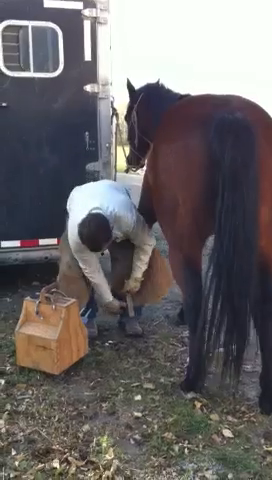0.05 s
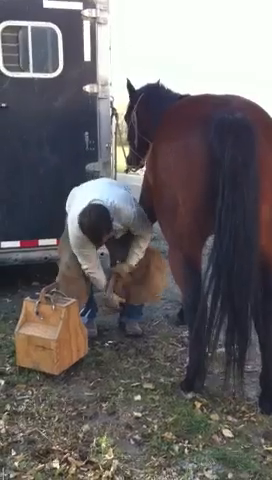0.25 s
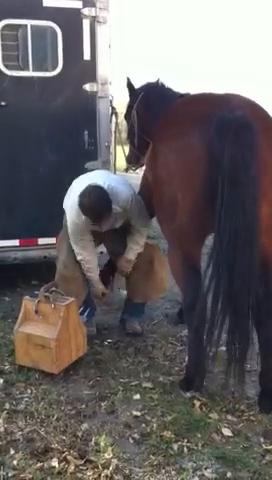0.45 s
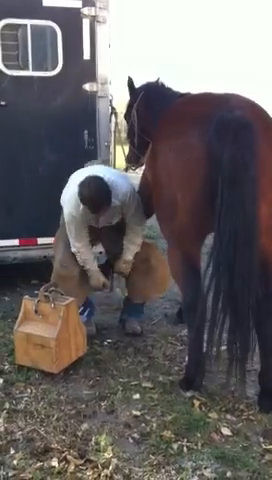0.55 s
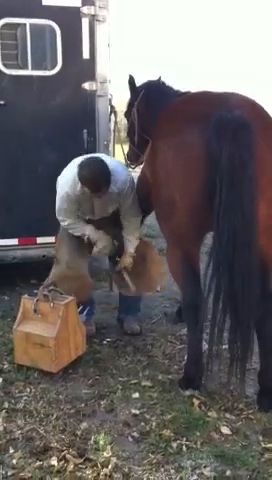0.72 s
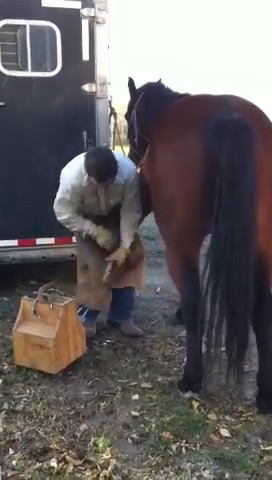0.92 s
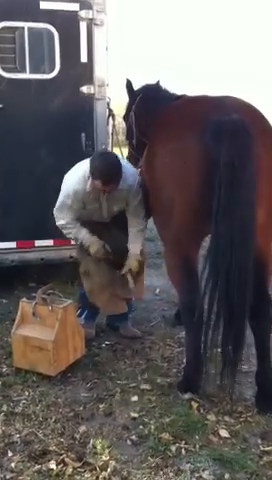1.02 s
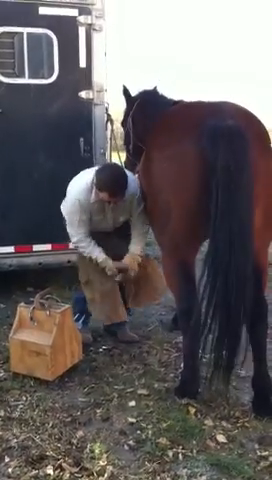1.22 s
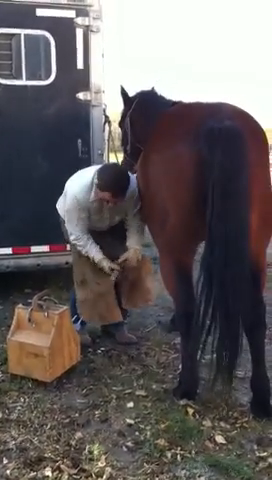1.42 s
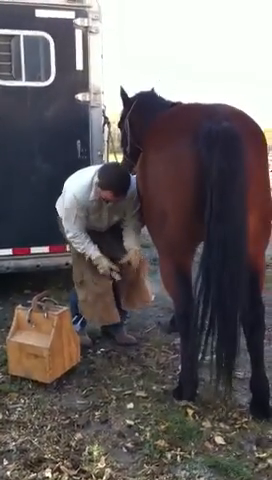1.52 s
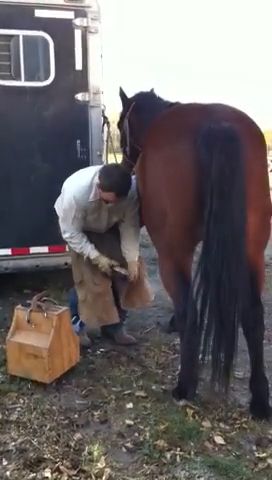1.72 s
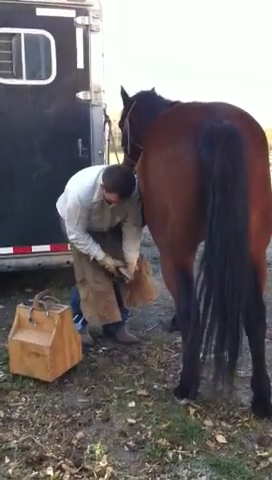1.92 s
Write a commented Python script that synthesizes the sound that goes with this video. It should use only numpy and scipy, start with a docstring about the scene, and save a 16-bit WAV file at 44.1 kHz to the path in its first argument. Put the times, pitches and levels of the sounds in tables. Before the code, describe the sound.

A handled microphone gives muffled, uneven thumps that ease off briefly and then return more softly. Behind them, a few metres off in the open air, are faint tool clicks, one tiny steel clink, leather swishes, boot scuffs and hiss.

```python
"""Dull bumps and rumble, probably a hand on the microphone, filtered through its case.
A few metres away, outdoors, a farrier picks up his tools beside a horse: light ticks, one steel
clink, dull knocks. Something swishes past the leather apron and boots scuff on dry ground,
both as grainy friction noise. A steady hiss lies underneath."""
import sys
import numpy as np
from scipy import signal
from scipy.fft import rfft, irfft
from scipy.io import wavfile

SR = 44100
rng = np.random.default_rng(int(sys.argv[2]) if len(sys.argv) > 2 else 0)


def store_wav(level_fs):
    """Save 16-bit WAV to argv[1]."""
    pcm = np.round(np.clip(np.atleast_2d(level_fs), -1, 1) * 32767)
    wavfile.write(sys.argv[1], SR, pcm.T.astype(np.int16))


N = 85995
TIME_S = np.arange(N) / SR


def from_db(db):
    """dB to gain."""
    return 10 ** (np.asarray(db) / 20)


def unit_rms(x):
    """Scale to rms 1."""
    return x / np.sqrt(np.mean(x ** 2) + 1e-20)


def envelope(rows):
    """Gain curve from rows of time_s, level_db."""
    return from_db(np.interp(TIME_S, *np.transpose(rows)))


def noise(colour):
    """Unit-rms noise shaped by rows of freq_hz, gain_db."""
    freq_hz, gain_db = np.transpose(colour)
    bins_hz = np.maximum(np.arange(N // 2 + 1) * SR / N, 1)
    gain = from_db(np.interp(np.log(bins_hz), np.log(freq_hz), gain_db))
    return unit_rms(irfft(rfft(rng.standard_normal(N)) * gain, N))


def butter(x, corner_hz, kind, order):
    """Causal Butterworth filter."""
    return signal.sosfilt(signal.butter(order, corner_hz, kind, fs=SR, output="sos"), x)


def swell(peak_s, rise_s, fall_s, roundness=1):
    """Rise to 1, then fall; roundness 1 is exponential, 2 bell-shaped."""
    return np.exp(-np.maximum((peak_s - TIME_S) / rise_s, (TIME_S - peak_s) / fall_s) ** roundness)


def strike(start_s, modes):
    """Decaying modes of a struck body."""
    age_s = np.maximum(TIME_S - start_s, 0)
    return sum(from_db(db) * np.exp(-np.log(1000) * age_s / t60_s) * np.sin(2 * np.pi * hz * age_s)
               for hz, db, t60_s in modes)


def grain(depth_db, rate_hz):
    """Fast random gain of a rubbed rough surface."""
    flicker = unit_rms(butter(rng.standard_normal(N), rate_hz, "low", order=2))
    return unit_rms(from_db(depth_db * flicker))


def through_case(force, top_hz):
    """A soft contact loses treble in the case and deep bass in the microphone."""
    bass_cut_hz = 122.3 * (top_hz / 190) ** 0.33  # firmer contact, less deep bass
    return butter(butter(force, top_hz, "low", order=4), bass_cut_hz, "high", order=4)


def handling(contact_sigma_s=0.00056, bump_trim_db=-1.13):
    """Soft pushes on the microphone: single ones bump, random pressure rumbles."""
    # contacts: peak_s, level_db, top_hz (higher is firmer)
    bumps = [(0.015, -45.5, 169), (0.083, -39, 195), (0.2098, -44.5, 108), (0.2229, -33.5, 160),
             (0.2339, -40.5, 174), (0.307, -44, 198), (0.3506, -29.5, 233), (0.3737, -36, 153),
             (0.4048, -46, 129), (0.4459, -35.5, 214), (0.4556, -33.5, 199), (0.4752, -36.5, 198),
             (0.5077, -43, 145), (0.5232, -33, 268), (0.5326, -31.5, 173), (0.5459, -39, 146),
             (0.5672, -24, 200), (0.5765, -17.5, 244), (0.588, -33, 197), (0.609, -29.5, 258),
             (0.6291, -32.5, 153), (0.6443, -27.5, 225), (0.6706, -42.5, 160), (0.6885, -40.5, 164),
             (0.7306, -31.5, 176), (0.791, -37, 163), (0.8086, -34.0, 171), (0.8613, -43.5, 172),
             (0.9135, -25.5, 250), (0.966, -30, 186), (0.9816, -44, 213), (1.0058, -40, 134),
             (1.0185, -44.5, 156), (1.0645, -32, 194), (1.091, -40, 110), (1.303, -51.5, 104),
             (1.4993, -47.5, 172), (1.5344, -43.5, 202), (1.5483, -44, 174), (1.5614, -49, 159),
             (1.5938, -40, 174), (1.6585, -35.5, 206), (1.6817, -36.5, 233), (1.738, -40.5, 154),
             (1.772, -51, 151), (1.9083, -51, 181), (1.9254, -39.5, 212)]
    # rumble between bumps: time_s, level_db
    rumble = [(0, -40.5), (.075, -58.5), (.1, -72), (.19, -64.5), (.23, -59.5), (.28, -64), (.33, -56),
              (.38, -46), (.42, -64), (.45, -46), (.49, -41), (.56, -46), (.67, -54), (.75, -67), (.9, -60),
              (1.01, -71), (1.08, -52), (1.12, -67), (1.27, -84.5), (1.31, -51.5), (1.35, -76.5),
              (1.47, -73), (1.54, -50.5), (1.6, -57), (1.63, -60.5), (1.67, -45), (1.71, -76), (1.78, -64),
              (1.84, -76), (1.88, -57.5), (1.95, -51.5)]
    push = signal.windows.gaussian(SR // 8, contact_sigma_s * SR)
    out = np.zeros(N)
    for peak_s, level_db, top_hz in bumps:
        bump = through_case(push, top_hz)
        magnitude = np.abs(signal.hilbert(bump))
        lag_s = (np.arange(len(bump)) - magnitude.argmax()) / SR
        placed = np.interp(TIME_S - peak_s, lag_s, bump / magnitude.max(), left=0, right=0)
        out += from_db(level_db + bump_trim_db) * placed
    pressure = signal.fftconvolve(rng.standard_normal(N), push, "same")
    return out + envelope(rumble) * unit_rms(through_case(pressure, top_hz=176.5))


def tool_ticks():
    """Dry tool contacts: a very short ring plus a broad crack."""
    # contacts: peak_s, level_db, pitch_hz, decay_s, crack_re_ring_db
    ticks = [(0.4913, -56, 1800, 0.0011, -2), (0.785, -65.5, 2290, .002, 2), (0.9762, -60, 3220, .003, 2),
             (1.091, -53, 4630, 0.00079, 5), (1.3421, -53.5, 5550, 0.00059, 4),
             (1.4202, -56.5, 4110, 0.0013, 2), (1.532, -54.5, 5500, 0.00082, -5),
             (1.879, -46, 5020, 0.00033, -1), (1.929, -55.5, 5550, 0.00072, -7)]
    # crack spectrum: freq_hz, gain_db
    colour = [(500, -5), (2500, 2.5), (6000, -6), (9000, -1.5), (15500, -15.5)]
    crack = noise(colour)
    out = np.zeros(N)
    for peak_s, level_db, pitch_hz, decay_s, crack_re_ring_db in ticks:
        shape = swell(peak_s, rise_s=0.0003, fall_s=decay_s)
        ring = shape * np.sin(2 * np.pi * pitch_hz * (TIME_S - peak_s))
        tick = unit_rms(ring) + from_db(crack_re_ring_db) * unit_rms(shape * crack)
        out += from_db(level_db) * shape.std() * tick
    return out


def knocks():
    """Dull knocks on horn or wood: low, well-damped modes."""
    # impacts: start_s, level_db
    hits = [(.4895, -53), (1.094, -41), (1.3048, -49.5)]
    # body modes: freq_hz, gain_db, t60_s
    modes = [(337, -10.5, 0.046), (612, 1.5, 0.023), (930, -9.5, 0.027), (1290, -14, 0.016),
             (2500, -13.5, 0.019)]
    return sum(from_db(level_db) * strike(start_s, modes) for start_s, level_db in hits)


def clink(start_s=0.3015, level_db=-62):
    """Steel struck once rings high and briefly."""
    # steel modes: freq_hz, gain_db, t60_s
    modes = [(6280, 2.5, 0.061), (6400, -4, 0.069), (6750, -9, 0.037), (11650, -13, .06)]
    return from_db(level_db) * strike(start_s, modes)


def swishes():
    """Leather and dry leaves rub in short, bright strokes."""
    # strokes: peak_s, level_db, rise_s, fall_s
    strokes = [(.304, -59.5, .003, 0.022), (0.53, -49.5, 0.011, .014), (.98, -67, 0.0077, .03),
               (1.1, -62.5, 0.028, .015), (1.262, -59.5, .018, 0.011), (1.345, -69, 0.013, 0.011),
               (1.415, -66, 0.026, .014), (1.53, -71, .014, 0.0099), (1.725, -61.5, 0.016, 0.013),
               (1.772, -60, .006, 0.0066), (1.94, -60, 0.012, 0.016)]
    # friction spectrum: freq_hz, gain_db
    colour = [(300, -14), (1200, -16), (2400, 3.5), (3600, -1.5), (5800, 2), (7500, 0), (10600, -0.5),
              (11200, 2.5), (13500, 2.5), (15500, -1)]
    gain = sum(from_db(level_db) * swell(peak_s, rise_s, fall_s, roundness=0.93)
               for peak_s, level_db, rise_s, fall_s in strokes)
    return gain * noise(colour) * grain(depth_db=2.0, rate_hz=210)


def scuffs():
    """Boots and clothes shift on the ground: dull, grainy friction."""
    # friction level: time_s, level_db
    levels = [(0, -65), (.1, -76), (.48, -70.5), (.492, -60.5), (.54, -63), (.6, -66.5), (.8, -67),
              (.88, -67.5), (.96, -70.5), (1.01, -61), (1.06, -63), (1.11, -61.5), (1.2, -67.5),
              (1.245, -64), (1.272, -55.5), (1.288, -59.5), (1.305, -59.5), (1.325, -65.5), (1.41, -63.5),
              (1.46, -68.5), (1.56, -65), (1.62, -75), (1.88, -77), (1.95, -64)]
    # friction spectrum: freq_hz, gain_db
    colour = [(100, -6), (280, 2), (600, 2.5), (1000, -1), (2000, -8), (4000, -13.5), (8000, -17.5),
              (15500, -29)]
    return envelope(levels) * noise(colour) * grain(depth_db=2.5, rate_hz=140)


def outdoor_hiss(level_db=-63.5):
    """Steady open-air background."""
    # background spectrum: freq_hz, gain_db
    colour = [(25, -31), (50, 2), (80, -9.5), (150, -2.5), (300, -4), (450, -10.5), (620, -6.5),
              (1000, -10.5), (1250, -9.5), (1700, -11.5), (3300, -13), (5200, -13), (7500, -17),
              (10500, -19), (12000, -19.5), (15500, -20.5)]
    return from_db(level_db) * noise(colour)


def scene():
    """Mono sum at the microphone."""
    return (handling() + tool_ticks() + knocks() + clink() + swishes() + scuffs() + outdoor_hiss())[None]


def record(dry):
    """Steep elliptic low-pass."""
    cutoff_hz = 15800
    return signal.sosfilt(signal.ellip(12, 0.1, 70, cutoff_hz, fs=SR, output="sos"), dry)


dry = scene()
out = record(dry)
store_wav(out)
```